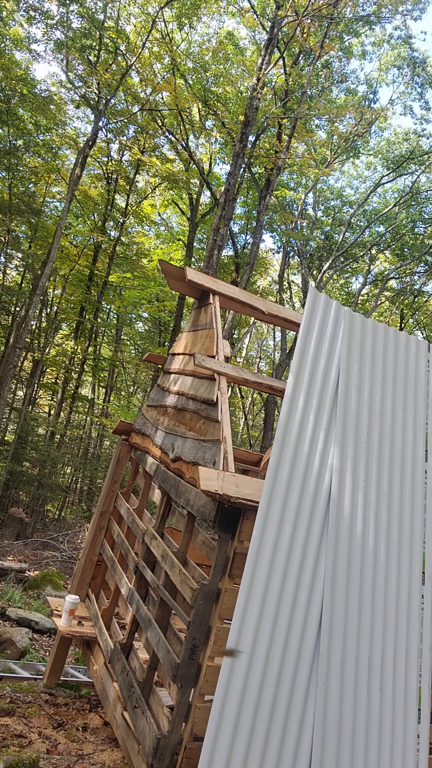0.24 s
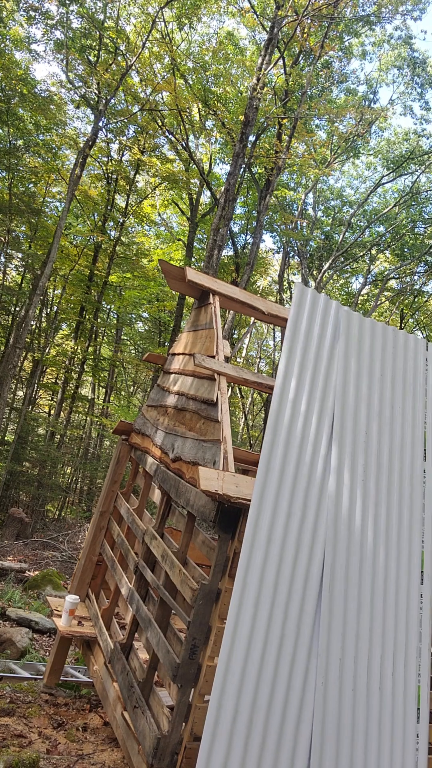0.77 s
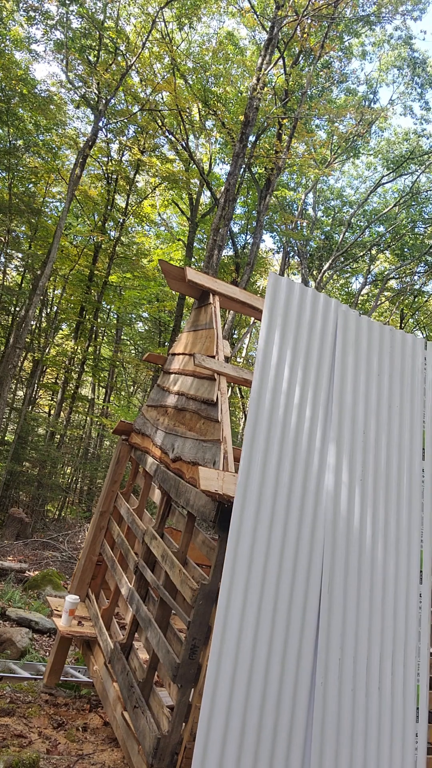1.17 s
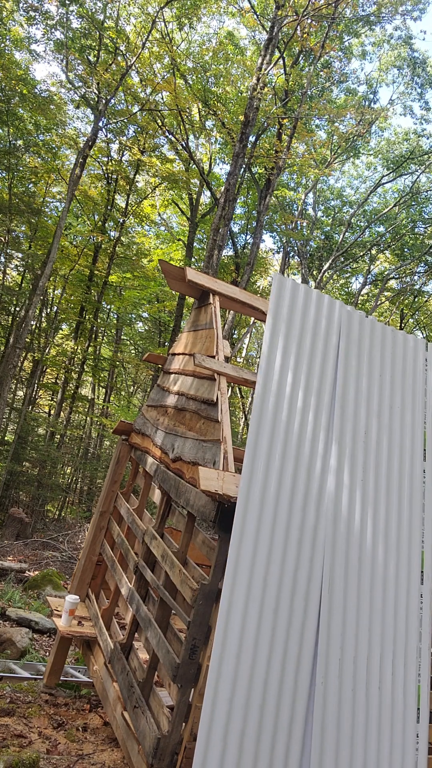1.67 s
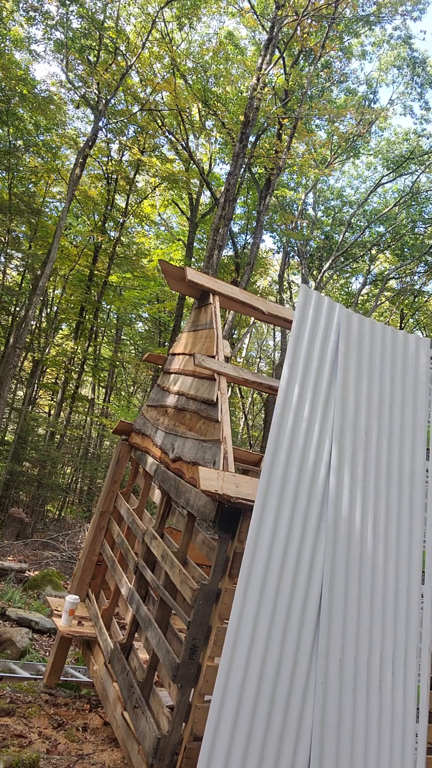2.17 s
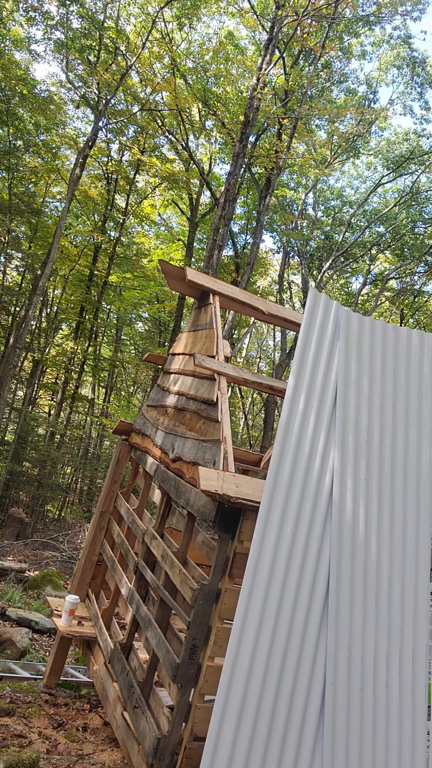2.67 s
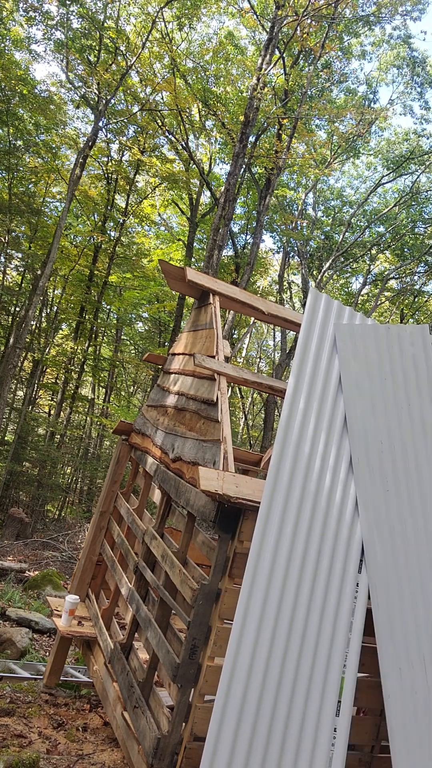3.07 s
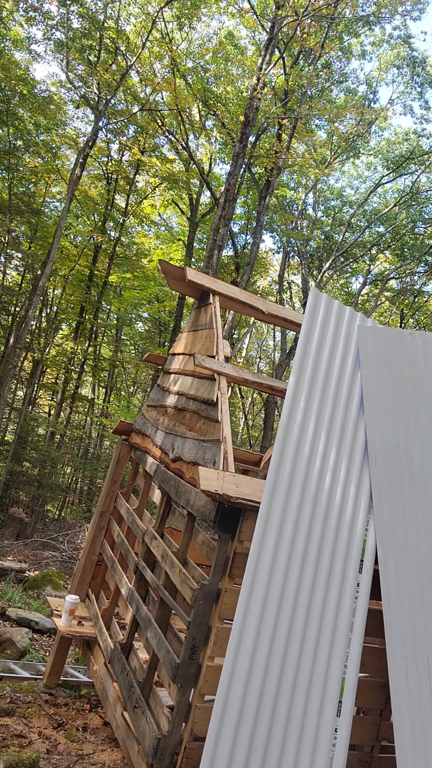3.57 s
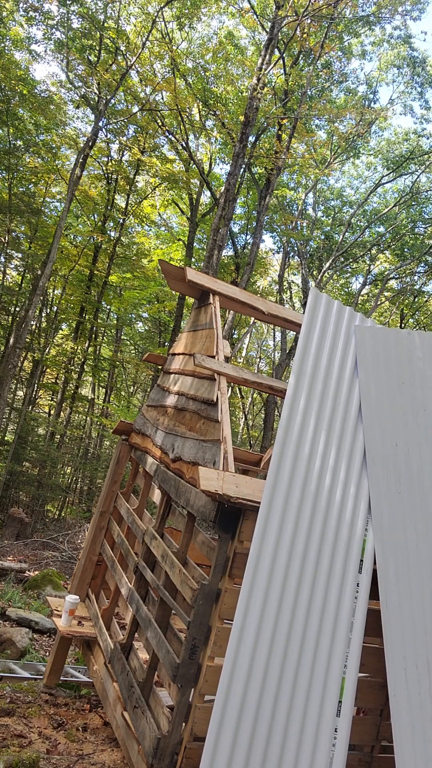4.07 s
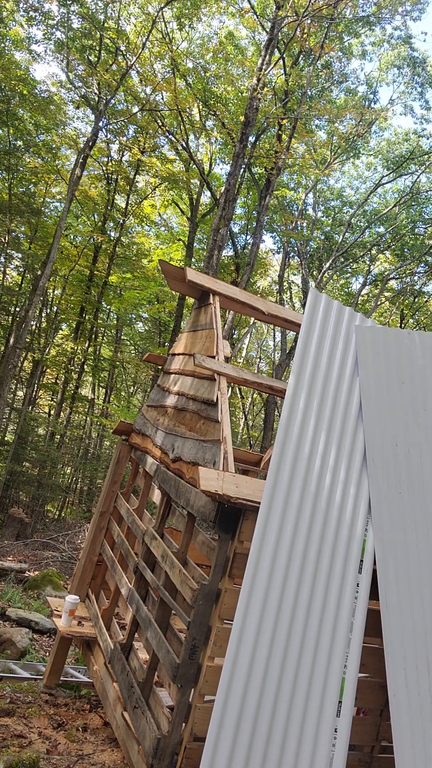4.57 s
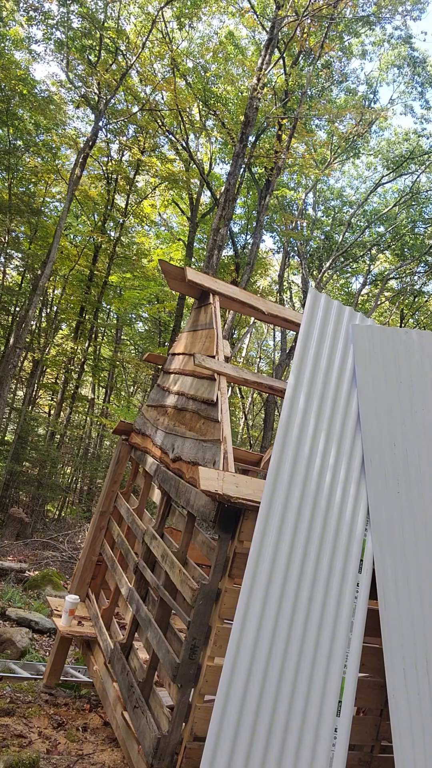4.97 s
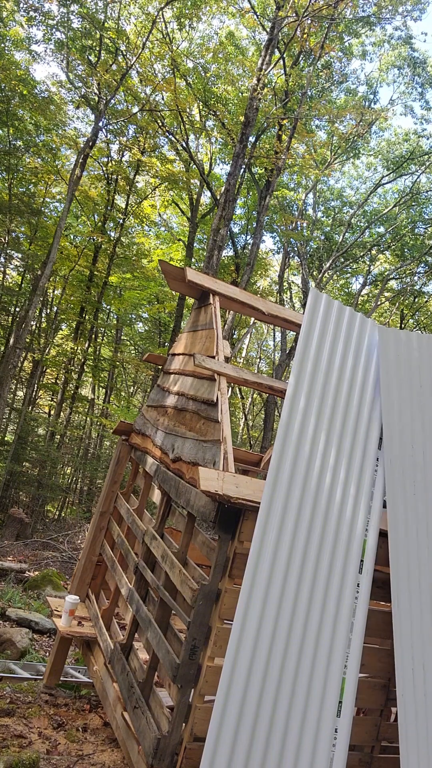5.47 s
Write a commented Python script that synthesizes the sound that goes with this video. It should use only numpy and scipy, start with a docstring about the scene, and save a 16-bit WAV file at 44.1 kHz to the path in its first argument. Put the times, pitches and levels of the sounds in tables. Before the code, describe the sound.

Close handling of thin corrugated plastic sheets outdoors among trees. Scattered hollow knocks and a bright tick come first, then two rough, gritty drags with short rib chirps, a run of clacks and flexing wobble, a quieter gap, and a last sharp clack with soft thumps. Behind lie faint leaves, far traffic and a low engine-like hum; late wind puffs rumble on the stereo microphone. Treble is dull.

```python
"""Corrugated sheets handled in a wood

Thin corrugated plastic sheets drag and scuff against each other and a wooden frame: random stick-slip
jolts make a gritty hiss and ring the ribs. Slipping ribs chirp, edges tick, and blows and soft pushes
excite damped modes as knocks and booms. Filtered noise gives far traffic, leaves, faint insects and
light wind on two microphone ports; two wavering sines give a low hum.
"""
import sys
import numpy as np
from scipy import signal
from scipy.fft import rfft, irfft, next_fast_len
from scipy.io import wavfile
from scipy.ndimage import uniform_filter1d

SR = 44100
rng = np.random.default_rng(int(sys.argv[2]) if len(sys.argv) > 2 else 0)


def file_out(sig):
    """Save sig as 16-bit WAV at sys.argv[1]."""
    # one column per channel
    cols = np.atleast_2d(sig).T
    # limit, then scale
    lim = np.clip(cols, -1, 1)
    pcm = np.round(lim * 32767).astype(np.int16)
    wavfile.write(sys.argv[1], SR, pcm)


N = 252252  # samples


def gain_of(db):
    """Level law: decibels to amplitude ratio."""
    return 10 ** (np.asarray(db) / 20)


def evened(x):
    """Power normalisation: scales to rms 1."""
    return x / np.sqrt(np.mean(x ** 2) + 1e-20)


def read(points, hz):
    """Spectral interpolation on a log-frequency axis."""
    f, value = np.transpose(points)
    return np.interp(np.log(hz + 1), np.log(f + 1), value)


def along(rows):
    """Linear interpolation in time: each column of a curve at every sample."""
    s, *columns = np.transpose(rows)
    return np.array([np.interp(np.arange(N) / SR, s, column) for column in columns])


def shaped(x, response):
    """Linear filtering: multiplies the spectrum by a function of frequency."""
    size = next_fast_len(N + 4096)
    return irfft(rfft(x, size) * response(np.fft.rfftfreq(size, 1 / SR)), size)[..., :N]


def drift(hz):
    """Low-passed noise: slow random modulation of rms 1."""
    return evened(signal.lfilter(*signal.butter(2, hz, fs=SR), rng.standard_normal(N)))


def ring(x, modes):
    """Modal superposition: sums damped resonances, each started in sine phase by an impulse."""
    out = np.zeros(len(x))
    for hz, width, db in modes:
        r = np.exp(-np.pi * width / SR)
        turn = 2 * np.pi * hz / SR
        out += gain_of(db) * signal.lfilter([0, np.sin(turn)], [1, -2 * r * np.cos(turn), r * r], x)
    return out


def slips(per_s, spread_db):
    """Stick-slip friction: random jolts of either sign, a few of them large."""
    size = gain_of(spread_db * np.minimum(rng.exponential(1, N), 4)) * rng.choice([-1., 1.], N)
    return size * (rng.random(N) < per_s / SR)


INSECTS_HZ, INSECTS_DB = 4750, -81.5  # band centre, rms level


def insects():
    """Narrow-band noise: far insects, unrelated at the two ports."""
    band = lambda hz: np.exp(-((hz - INSECTS_HZ) / 130) ** 2)
    return gain_of(INSECTS_DB) * evened(shaped(rng.standard_normal((2, N)), band))


# Spectral density of traffic and leaves: frequency_hz, relative_level_db (per Hz)
WOODS_SPECTRUM = [(35, -20), (60, 0.5), (149, -32), (180, -48.5), (394, -40), (548, -31.5), (596, -31),
                  (1040, -29.5), (1980, -36.5), (2640, -42.5), (4610, -42), (8400, -57.5), (10900, -95),
                  (18500, -120)]
# Left-right correlation of that noise: frequency_hz, correlation (-1 to 1)
WOODS_LIKENESS = [(100, 1), (350, 0.83), (1000, 0.55), (1700, 0.18), (3000, -0.35), (6000, 0.18)]
WOODS_DB = -54.5  # rms level


def woods():
    """Partially coherent diffuse field: noise of far traffic and leaves with faint drifting patches."""
    frames, hz = N // 256 + 5, np.fft.rfftfreq(1024, 1 / SR)
    a, b, c, d, patches = rng.standard_normal((frames, 513, 5)).T
    patches = evened(uniform_filter1d(uniform_filter1d(patches, 12, 0), 14, 1))
    same = np.clip(read(WOODS_LIKENESS, hz), -1, 1)[:, None]
    left = a + 1j * b
    right = same * left + np.sqrt(1 - same ** 2) * (c + 1j * d)
    z = np.array([left, right]) * gain_of(read(WOODS_SPECTRUM, hz)[:, None] + 0.82 * patches)
    noise = signal.istft(z, nperseg=1024, noverlap=768)[1][:, :N]
    return gain_of(WOODS_DB) * evened(noise)


# Slow level curve of the hum: time_s, level_db (rms of the lower line, before wavering)
HUM_LEVEL = [(0.0, -50.5), (0.86, -47.5), (1.05, -47), (1.37, -46), (5.72, -52.5)]
LOW_HZ, HIGH_HZ = 50.85, 87.1  # mean pitches
HIGH_DB, HIGH_FADE_DB_PER_S = -5.5, -2.5  # upper line: start relative to the lower, then its fade


def hum():
    """Randomly modulated tones: a far engine heard as two wavering lines, the upper fading away."""
    t = np.arange(N) / SR
    low = np.sin(2 * np.pi * np.cumsum(LOW_HZ + 0.67 * drift(4.4)) / SR) * gain_of(2.1 * drift(3.3))
    high = np.sin(2 * np.pi * np.cumsum(HIGH_HZ + 2.8 * drift(3.84)) / SR)
    high *= gain_of(HIGH_DB + HIGH_FADE_DB_PER_S * t)
    return np.sqrt(2) * gain_of(along(HUM_LEVEL)[0]) * (low + high)


# Spectral density of wind pressure: frequency_hz, relative_level_db (per Hz)
WIND_SPECTRUM = [(15, -5), (30, -7), (60, 9), (100, 1.5), (160, -30), (300, -36), (900, -100)]
# Puffs of wind: peak_s, level_db, left_minus_right_db
WIND_PUFFS = [(1.3, -52, -12), (2.65, -50.5, -17.5), (3.9, -56.5, -9), (4.17, -47.5, -8),
              (4.73, -41.5, -1.5), (4.921, -47, 18.5), (5.03, -52.5, -11.5), (5.3, -50, -13),
              (5.52, -40, -8), (5.7, -50, -9)]
BREEZE_DB, BREEZE_DB_PER_S = -58.5, -0.7  # steady part: level at the start, slope
PUFF_S = 0.085  # time from a puff's peak to 1/e


def wind():
    """Local turbulent pressure, independent at each port: an easing breeze and puffs favouring one side."""
    lumps = np.array([gain_of(4 * drift(14)) * rng.standard_normal(N) for _ in range(2)])
    t = np.arange(N) / SR
    level = gain_of(BREEZE_DB + BREEZE_DB_PER_S * t)
    for s, db, pan_db in WIND_PUFFS:
        sides = gain_of([[db + pan_db / 2], [db - pan_db / 2]])
        level = level + sides * np.exp(-((t - s) / PUFF_S) ** 2)
    return evened(shaped(lumps, lambda hz: gain_of(read(WIND_SPECTRUM, hz)))) * level


# Bright ticks of edge on edge: start_s, level_db (peak before the band shaping)
EDGE_TICKS = [(0.787, -16), (0.953, -41), (1.062, -44), (2.312, -42), (3.369, -29.5), (3.672, -39),
              (3.688, -44), (3.909, -35), (5.537, -32), (5.615, -31), (5.638, -28.5)]
TICK_HZ, TICK_WIDTH_HZ = 5970, 2900  # band centre, half-width


def ticks():
    """Impact of a hard edge: about a millisecond of bright noise with a short tail."""
    out, t = np.zeros(N), np.arange(1500) / SR
    decay = np.exp(-t / .0012) + .15 * np.exp(-t / .006)
    for s, db in EDGE_TICKS:
        tick = np.diff(rng.standard_normal(len(t)), prepend=0) * decay
        out[round(s * SR):][:len(t)] += gain_of(db) * tick / abs(tick).max()
    return shaped(out, lambda hz: 1 / (1 + ((hz - TICK_HZ) / TICK_WIDTH_HZ) ** 2))


# Chirps of a slipping rib: peak_s, level_db (before roughening), pitch_hz (mean), length_s
RIB_CHIRPS = [(0.958, -48, 2700, 0.014), (1.818, -44, 950, 0.013), (0.786, -42, 3100, 0.01),
              (0.787, -43.5, 5780, 0.0084), (1.068, -42, 866, 0.023), (2.179, -37, 850, 0.016),
              (2.202, -34, 790, 0.029), (2.303, -33, 726, 0.013), (2.313, -31, 750, 0.014),
              (2.352, -34, 710, .018), (2.374, -34.5, 717, 0.031), (2.79, -35.5, 1030, 0.0142),
              (2.826, -28.5, 1300, 0.02), (2.871, -36, 2440, 0.0098), (2.962, -41.5, 872, 0.023),
              (2.982, -43.5, 1370, 0.023), (3.045, -42, 983, 0.02), (3.069, -45, 5050, 0.013),
              (3.072, -43, 1110, .022), (3.097, -38, 1096, .012), (3.118, -34.5, 2038, 0.019),
              (3.306, -30.5, 1250, 0.012)]
LEAN = .65  # below 1 a chirp or glint swells faster than it fades


def chirps():
    """Nearly periodic stick-slip of a rib: a short swelling tone, rough in level and pitch."""
    out, shake, grain = np.zeros(N), drift(140), drift(500)
    for s, db, hz, length in RIB_CHIRPS:
        u = np.arange(0, 1, 1 / (length * SR))
        start = round((s - length * .5 ** (1 / LEAN)) * SR)
        at = slice(start, start + len(u))
        tone = np.sin(2 * np.pi * np.cumsum(hz * (1 + 0.027 * shake[at])) / SR)
        rough = 1 + 0.24 * grain[at]
        out[at] += gain_of(db) * tone * rough * np.sin(np.pi * u ** LEAN) ** 2
    return out


# Modes of the ribs: pitch_hz, width_hz, relative_level_db
RIB_MODES = [(753, 67, -7), (855, 76, 8), (1047, 112, 4), (1230, 130, 6), (1370, 50, -1.5), (1950, 1100, 7)]
# Low modes of the whole panel: pitch_hz, width_hz, relative_level_db
PANEL_MODES = [(102.6, 28.3, 0), (162.7, 32.7, -1.5), (204.8, 21.4, -2.5), (247.3, 50.5, -7),
               (299, 43.5, -2.5), (359, 48.4, -3.5), (424, 200, -1.5)]
# Blows: start_s, ribs_level_db (peak), thud_level_db (peak of the panel part)
BLOWS = [(0.364, -41.5, -41.5), (0.397, -39, -41.5), (0.767, -37.5, -38.5), (0.786, -28.5, -34),
         (0.798, -28, -31.5), (0.855, -49, -29), (0.813, -40, -37), (1.063, -40, -36.5), (1.085, -43, -35),
         (1.318, -44.5, -39), (1.593, -35, -37), (1.911, -30.5, -36), (2.298, -37, -37.5),
         (2.311, -35, -33), (2.326, -39, -30.5), (2.426, -35, -54), (3.364, -40, -30), (3.42, -42, -35.5),
         (3.391, -26.5, -39), (3.469, -51, -55), (3.494, -43, -52), (3.616, -57, -34),
         (3.672, -31.5, -39.5), (3.69, -39, -35), (3.727, -36, -42), (3.824, -50, -39), (3.909, -32.5, -45),
         (4.087, -39, -35.5), (4.111, -35, -38.5), (4.297, -53, -36.5), (4.803, -47, -47.5),
         (5.276, -50, -41.5), (5.372, -47, -43.5), (5.558, -59, -27.5), (5.598, -20, -36),
         (5.613, -51, -36.5), (5.667, -54, -33.5)]
BEND, SPOT_DB = 0.071, 0.7  # pitch share and mode level that vary from blow to blow


def bent(modes):
    """Modal perturbation: another spot struck, another bend, so modes shift in pitch and strength."""
    shifted = np.array(modes) * [1 + BEND * rng.uniform(-1.18, 1), 1, 1]
    return shifted + np.outer(rng.standard_normal(len(modes)), [0, 0, SPOT_DB])


def knocks():
    """Impact excitation of modes: each blow rattles for milliseconds into ribs and panel."""
    out, t = np.zeros(N + 4000), np.arange(4000) / SR
    bump = np.hanning(24)[np.minimum(np.arange(len(t)), 23)]
    # the panel is pushed and springs back
    u = np.pi * np.minimum(t / 0.0042, 1)
    spring = np.sin(2 * u) * np.sin(u) * np.exp(-t / 0.0043)
    for s, ribs_db, thud_db in BLOWS:
        noise = rng.standard_normal((2, len(t)))
        rattle = noise[0] * np.exp(-t / 0.0078) + 2.1 * bump
        push = spring + 0.05 * noise[1] * np.exp(-t / 0.0062)
        ribs = ring(rattle, bent(RIB_MODES))
        thud = ring(push, bent(PANEL_MODES))
        blow = gain_of(ribs_db) * ribs / abs(ribs).max() + gain_of(thud_db) * thud / abs(thud).max()
        out[round(s * SR):][:len(t)] += blow
    return out[:N]


# How hard the sheet is handled: time_s, level_db (wobble, before the power left by thuds is added)
HANDLING_LEVEL = [(0, -66.5), (.7, -58), (1.5, -57), (2.2, -47), (2.4, -49.5), (2.55, -51), (3.3, -46),
                  (4.4, -52), (4.7, -60), (5.45, -57), (5.72, -51)]
AFTER_DB, SETTLE_S = -9, 0.082  # wobble relative to the thud that leaves it; its amplitude decay time


def flex():
    """Forced bending: soft pushes into low modes and a faint rattle, from handling and after thuds."""
    soft = lambda x, s: signal.oaconvolve(x, np.hanning(round(s * SR)))[:N]
    wobble = evened(ring(soft(slips(400, 2.1), 0.0023), PANEL_MODES))
    rattle = evened(ring(soft(slips(160, 3.8), 0.00047), RIB_MODES))
    shaken = np.zeros(N)
    for s, _, thud_db in BLOWS:
        shaken[round(s * SR)] = gain_of(thud_db + AFTER_DB) ** 2
    settling = signal.lfilter([1], [1, -np.exp(-2 / SETTLE_S / SR)], shaken)
    power = gain_of(along(HANDLING_LEVEL)[0]) ** 2 + settling
    return np.sqrt(power) * (wobble + gain_of(-11.5) * rattle)


def glints(pitches, per_s, length):
    """Brief frictional squeaks of plastic on plastic: each near one pitch, sliding up or down."""
    out, t = np.zeros(N), np.arange(0, length, 1 / SR)
    swell = np.sin(np.pi * (t / length) ** LEAN) ** 2
    for hz in pitches:
        bent_t = t * (1 + 0.033 * rng.uniform(-1.49, 1) * (t / length - 1))
        squeak = np.sin(2 * np.pi * hz * bent_t) * swell
        out += signal.oaconvolve(slips(per_s, 3.9), squeak)[:N]
    return evened(out)


# Spectral density of the grit: frequency_hz, relative_level_db (per Hz)
GRIT_SPECTRUM = [(1200, -32), (1800, 1), (2600, -3.5), (4000, -3), (5500, -3.5), (7000, -11), (9000, -0.5),
                 (15000, -18.5)]


def gritty_hiss():
    """Friction noise: shaped jolts in drifting time-frequency patches, with glints."""
    grit = shaped(slips(4500, 3.4), lambda hz: gain_of(read(GRIT_SPECTRUM, hz)))
    _, _, z = signal.stft(grit, SR, nperseg=256)
    patches = evened(uniform_filter1d(uniform_filter1d(rng.standard_normal(z.shape), 4, 0), 4, 1))
    grit = evened(signal.istft(z * gain_of(3.6 * patches), SR, nperseg=256)[1][:N])
    return grit + gain_of(-11.5) * glints(np.geomspace(1700, 7400, 20), per_s=4.5, length=0.015)


# Two long drags of sheet on sheet, one curve each: time_s, hiss_level_db, ribs_level_db (before clumping)
LONG_DRAGS = [
    [(2.03, -66.5, -77), (2.075, -56, -46), (2.16, -53.5, -45.5), (2.21, -69, -68), (2.232, -53, -42),
     (2.255, -65, -59), (2.285, -65, -73), (2.295, -48.5, -37.5), (2.35, -55, -43.5), (2.385, -70, -50),
     (2.45, -67, -52), (2.5, -78, -64)],
    [(2.74, -60, -51), (2.762, -49, -46), (2.8, -50.5, -50.5), (2.812, -64, -50.5), (2.83, -49, -42),
     (2.858, -62, -53), (2.87, -48, -54), (2.935, -71, -60), (2.95, -44.5, -55), (2.968, -59, -49.5),
     (3.0, -50.5, -52.5), (3.08, -52, -48.5), (3.093, -57, -49), (3.11, -50, -50), (3.165, -51.5, -50),
     (3.19, -62, -46.5), (3.27, -51, -52), (3.31, -59.5, -51.5), (3.35, -63.5, -63)],
]
# Short scuffs: start_s, length_s, hiss_level_db, ribs_level_db (before envelope and clumping)
SHORT_SCUFFS = [(0.777, 0.016, -52.5, -47.5), (0.938, 0.029, -58.5, -54.5), (1.056, 0.01, -60.5, -51.5),
                (1.517, 0.057, -71.5, -59.5), (1.587, 0.021, -64, -51.5), (1.9, 0.019, -68.5, -51),
                (3.366, 0.03, -56, -46), (3.665, 0.034, -63, -53.5), (3.903, 0.0082, -60, -53),
                (4.105, 0.01, -62, -59.5), (5.518, 0.015, -56, -62), (5.594, 0.032, -71, -49.5)]
DRAG_AIR_DB, SCUFF_AIR_DB = (3, 7), -1.5  # gain of the hiss above 8900 Hz: each drag, every scuff
GRIP_S, EASE_S, DROP_S = 0.004, 0.98, 0.0082  # scuff rise, slow easing and final drop
TAIL_S, TAIL = 0.055, 0.64  # decay time and relative amplitude of the longer tail


def slide():
    """Sliding friction: grit hisses in clumps between the sheets and jolts ring the ribs."""
    grit = gritty_hiss()
    air = shaped(grit, lambda hz: hz > 8900)
    ribs, clumps = evened(ring(slips(1500, 1.3), RIB_MODES)), gain_of(1.66 * drift(56))
    ribs = evened(ribs + gain_of(-4.0) * glints(np.geomspace(680, 1450, 10), per_s=12, length=0.012))
    out, t = np.zeros(N), np.arange(N) / SR
    for rows, air_db in zip(LONG_DRAGS, DRAG_AIR_DB):
        hiss, rung = gain_of(along(rows)) * (t > rows[0][0]) * (t < rows[-1][0])
        out += hiss * (grit + (gain_of(air_db) - 1) * air) + rung * ribs
    scuff_hiss = grit + (gain_of(SCUFF_AIR_DB) - 1) * air
    for s, length, db, ribs_db in SHORT_SCUFFS:
        # quick grip, a rub that slowly eases, then a fast drop and a longer tail
        u = np.maximum(t - s, 0)
        after = np.maximum(u - length, 0)
        release = np.exp(-after / DROP_S) + TAIL * np.exp(-after / TAIL_S)
        shape = np.minimum(u / GRIP_S, 1) * np.exp(-u / EASE_S) * release
        out += shape * (gain_of(db) * scuff_hiss + gain_of(ribs_db) * ribs)
    return clumps * out


# Left-right likeness of the sheets: frequency_hz, likeness (-1 to 1)
SHEET_LIKENESS = [(350, 0.91), (1000, 0.72), (1700, 0.6), (3000, 0.016), (6000, 0.25)]


def ports(x):
    """Decorrelation: bass alike, treble spread between the sides by slowly rotating random filters."""
    taps = rng.standard_normal((2, 3000)) * np.exp(-np.arange(3000) / SR / 0.011)
    turn = 2 * np.pi * 9 * np.arange(N) / SR  # filters rotate at 9 Hz
    fed = x * np.array([np.sin(turn), np.cos(turn)])
    a, b = signal.oaconvolve(fed, taps / np.linalg.norm(taps[0]), axes=1)[:, :N]
    other = a * np.sin(turn) + b * np.cos(turn) + (a * np.cos(turn) - b * np.sin(turn))
    same = lambda hz: np.clip(read(SHEET_LIKENESS, hz), -1, 1)
    right = shaped(x, same) + shaped(other, lambda hz: np.sqrt((1 - same(hz) ** 2) / 2))
    return np.array([x, right])


def scene():
    """Linear superposition of all sources at the two ports."""
    sheets = slide() + flex() + knocks() + ticks() + chirps()
    return ports(sheets) + woods() + insects() + hum() + wind()


# Treble shaping of the whole sound: frequency_hz, gain_db
TREBLE_SHAPE = [(7400, 0.5), (8100, -17), (8500, -40), (9200, -42.5), (9800, -24), (15000, -18)]
# Uneven levels of the two ports: frequency_hz, left_minus_right_db
PORT_BALANCE = [(1700, 0.5), (2400, 2.5), (3100, 7), (3800, 4), (5300, 0), (6500, 4.5), (8200, 7),
                (10500, 10)]
HISS_DB, EDGE_HZ = -88.5, 15800  # white-noise gain above 11 kHz (6.2 dB less below); upper band limit


def record(dry):
    """Output filtering: uneven port levels, dulled treble, faint hiss, band limit."""
    balance = lambda hz: np.outer([.5, -.5], read(PORT_BALANCE, hz))
    heard = shaped(dry, lambda hz: gain_of(read(TREBLE_SHAPE, hz) + balance(hz)))
    hiss = shaped(rng.standard_normal(dry.shape), lambda hz: gain_of(HISS_DB - 6.2 * (hz < 11000)))
    low_pass = signal.firwin(511, EDGE_HZ, window=("kaiser", 9), fs=SR)
    return signal.oaconvolve(heard + hiss, low_pass[None], "same")


dry = scene()
out = record(dry)
file_out(out)
```